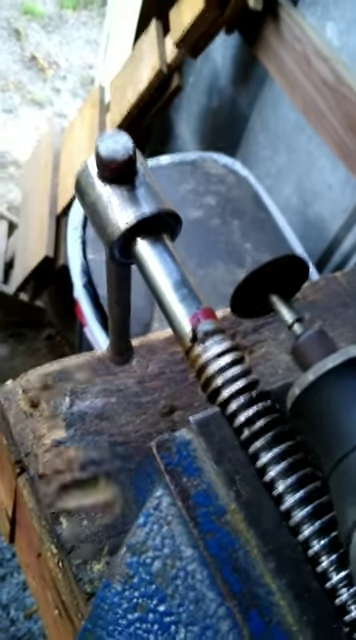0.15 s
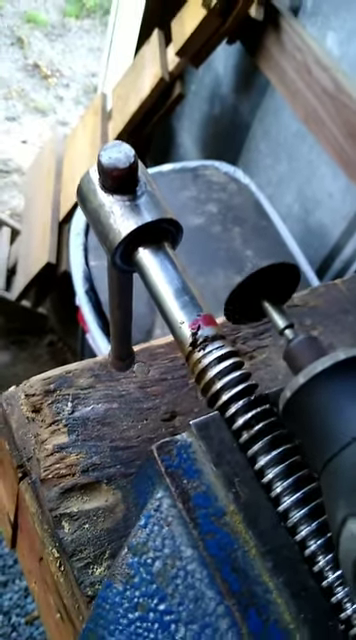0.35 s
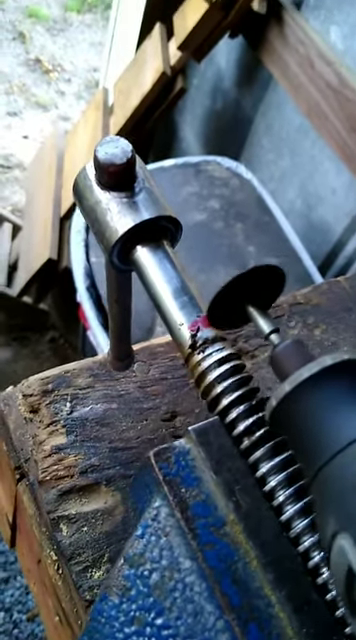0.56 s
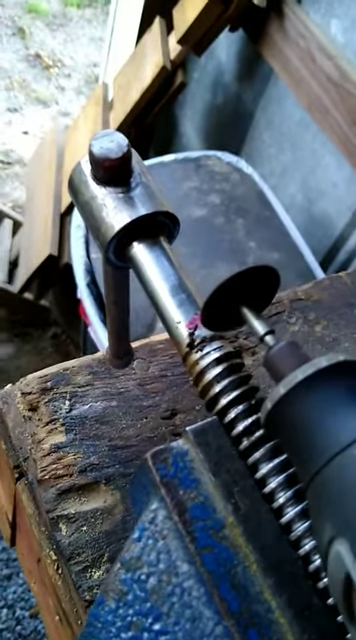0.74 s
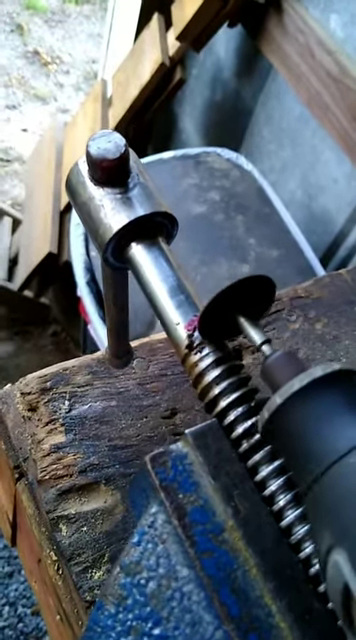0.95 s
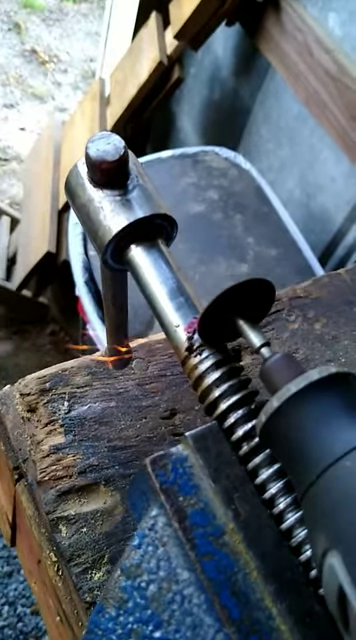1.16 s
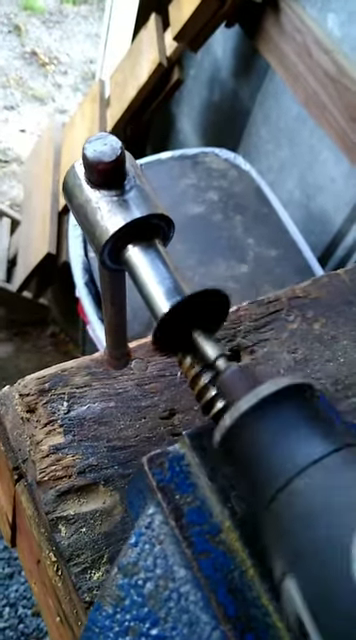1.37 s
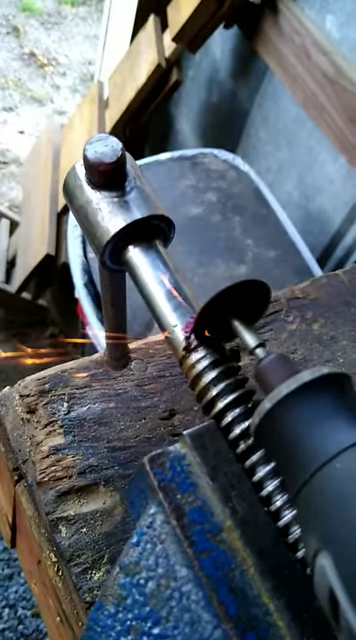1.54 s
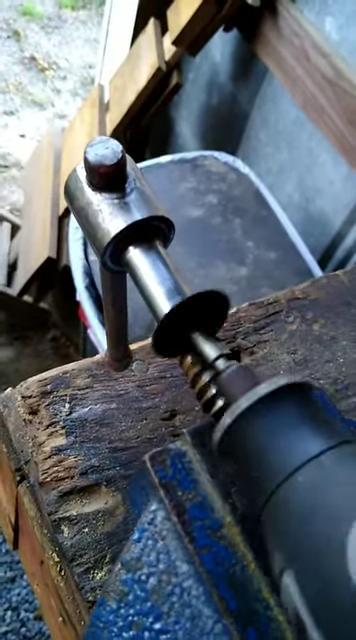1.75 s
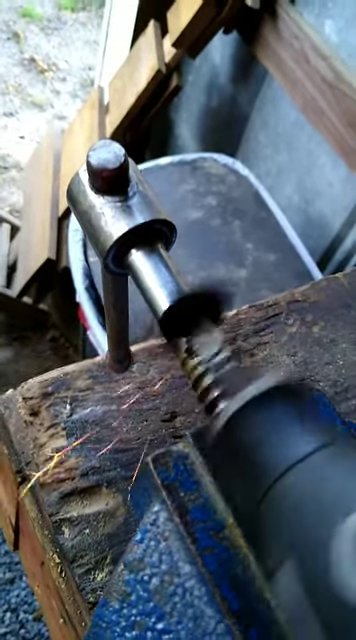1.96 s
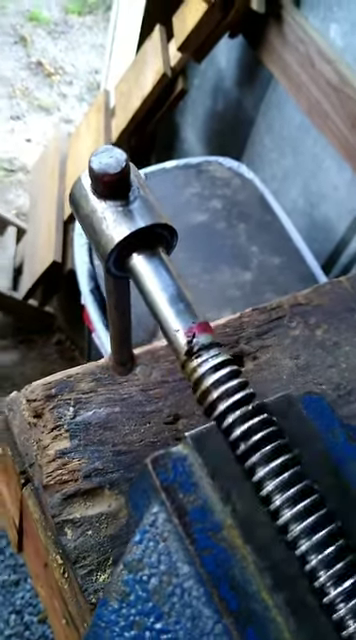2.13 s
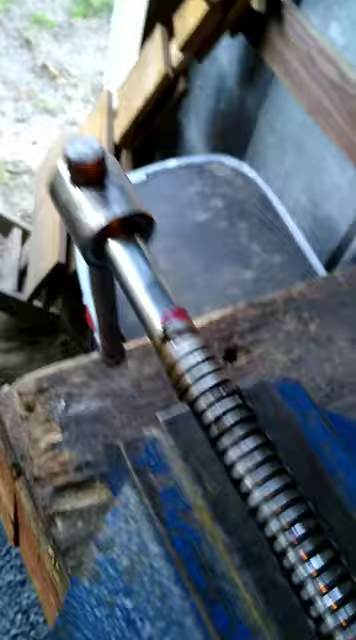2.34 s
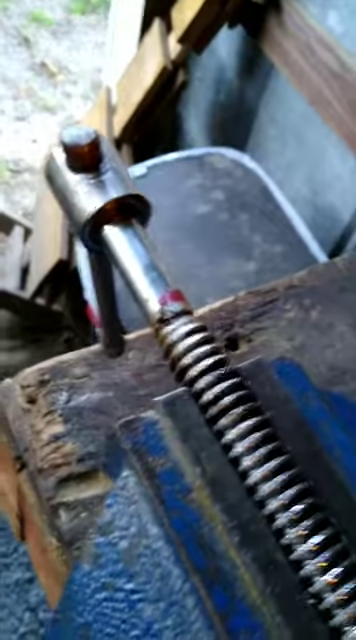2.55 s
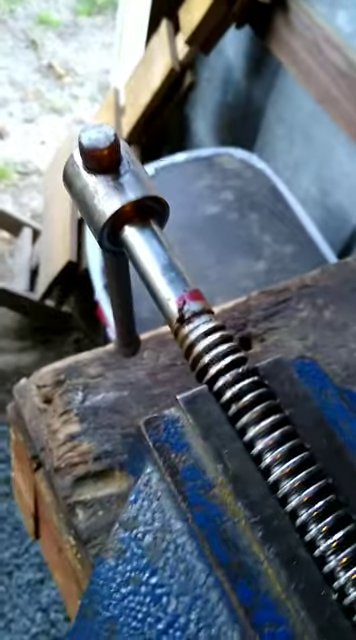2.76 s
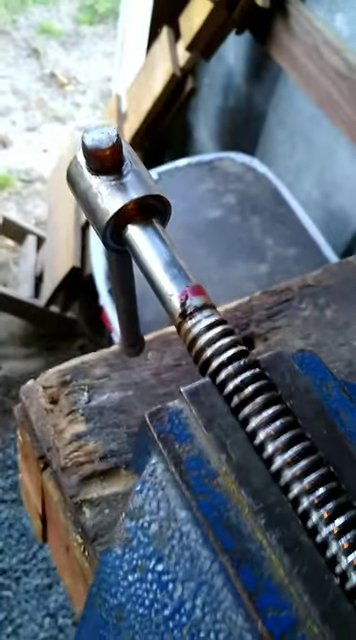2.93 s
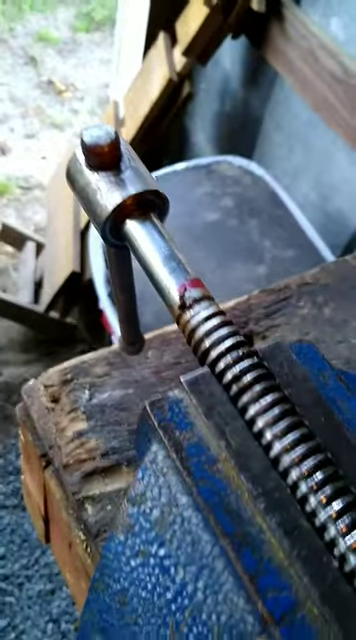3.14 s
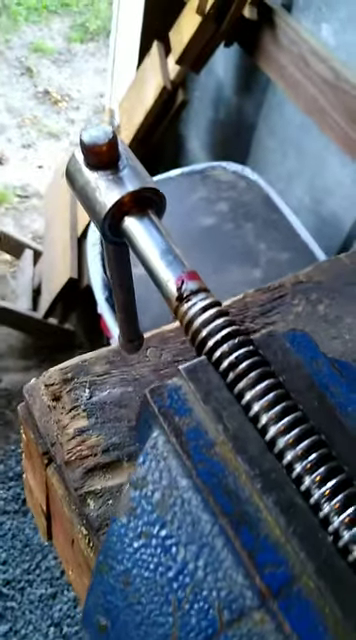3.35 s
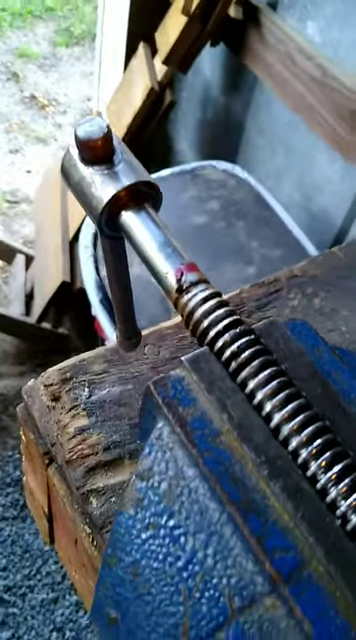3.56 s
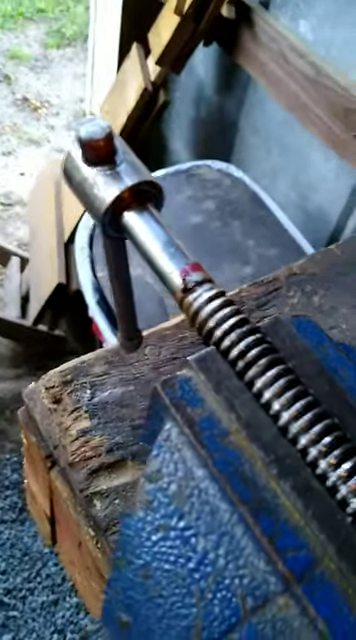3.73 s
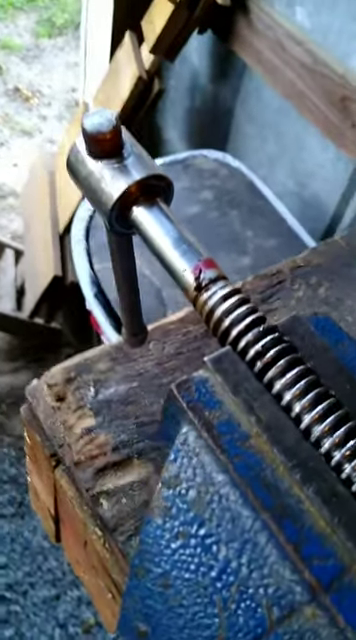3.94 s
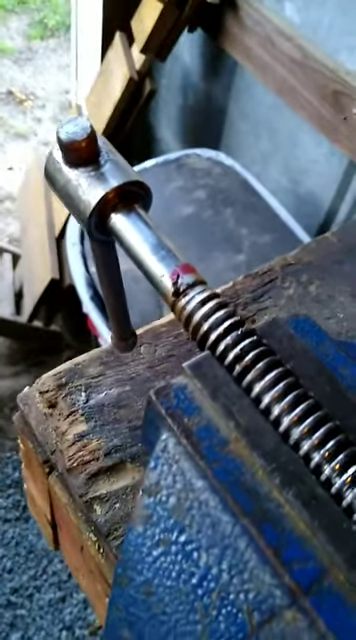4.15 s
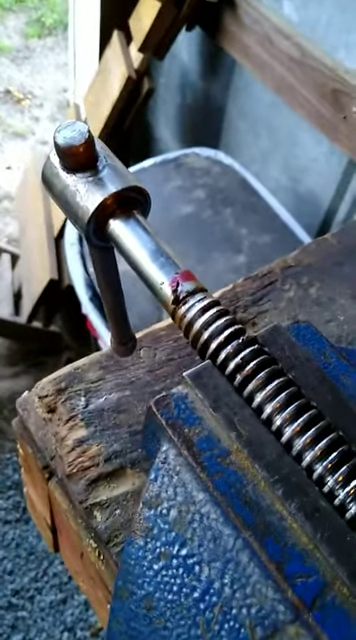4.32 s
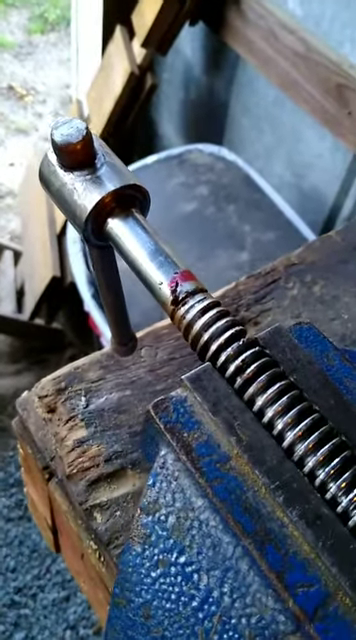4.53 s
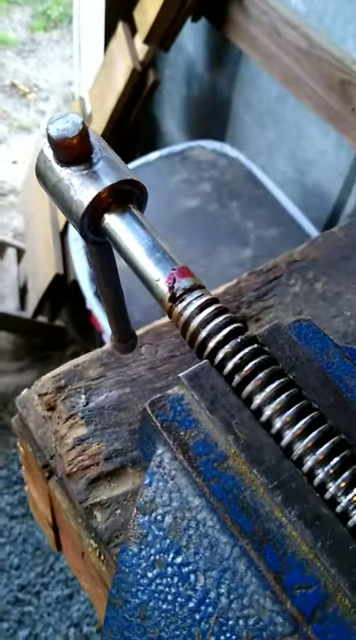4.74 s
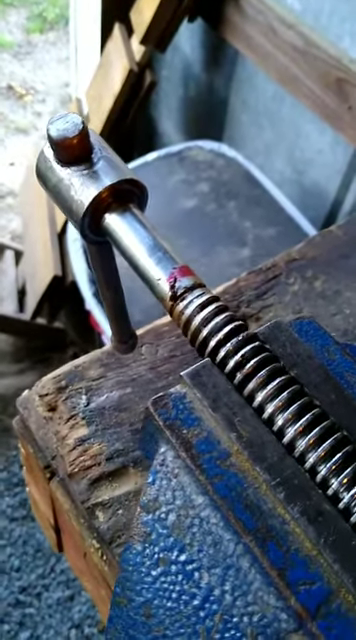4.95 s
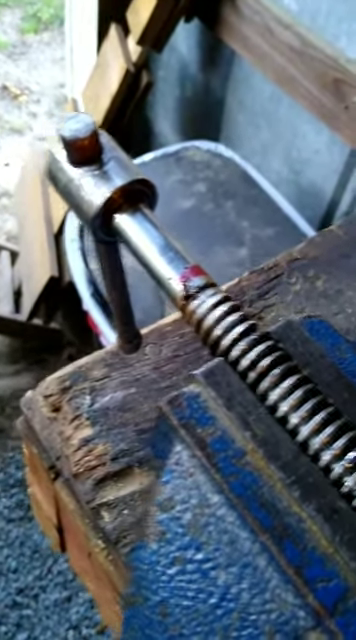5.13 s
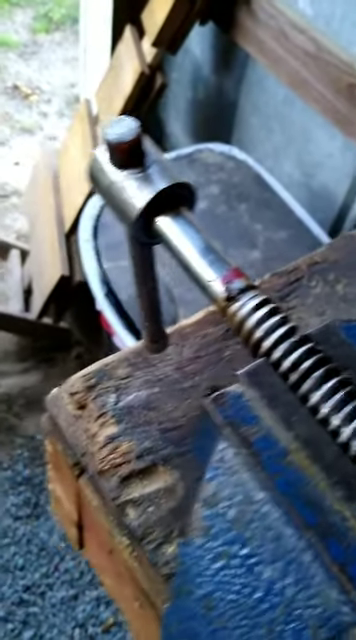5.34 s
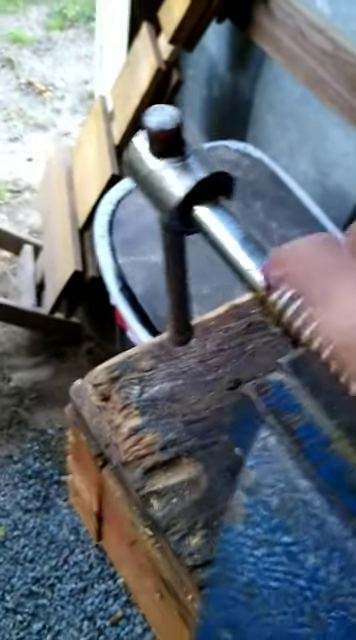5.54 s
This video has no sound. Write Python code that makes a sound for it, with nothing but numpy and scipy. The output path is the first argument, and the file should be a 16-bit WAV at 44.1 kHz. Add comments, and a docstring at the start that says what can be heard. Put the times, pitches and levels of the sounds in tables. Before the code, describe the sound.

From the start a small cordless rotary tool runs close to the microphone at very high speed: a steady hum near 480 Hz, shrill motor tones around 9-11 kHz, whirring fan air and fine brush hiss. At about 1.0 s the cut-off disc touches a clamped steel screw with a brief graze, then grinds until 2.13 s: a loud, bright, sizzling rasp with rough growl, flickering in strength. The motor pitch sags and recedes behind the cut; dull bumps occur near 1.45, 1.55 and 1.64 s. A faint low hum from the screw begins around 2.0 s and fades by about 2.5 s. After the disc lifts, the pitch quickly climbs back. At 2.75 s the tool lands on the wooden bench with a hollow, rapidly bouncing thud, slight rattle and short dull tail. It keeps whining to the end at 5.6 s, its air noise softer and its treble gently shifting.

```python
"""A cordless rotary tool whines at about 29000 rpm: motor tones, a spindle hum, fan air and brush hiss.
Its cut-off disc then grinds a steel screw in a vice for a second: looped rim noise, growl and dull bumps.
The motor sags under the load and gain control turns the loud cut down, motor included.
Late in the cut the screw starts a brief hum, a low sine that fades after it; the spindle runs back up.
The tool lands on a wooden bench, a bank of ringing modes, and keeps running to the end."""
import sys
import numpy as np
from scipy import signal
from scipy.fft import rfft, irfft, next_fast_len
from scipy.io import wavfile
from scipy.ndimage import uniform_filter1d, minimum_filter1d, map_coordinates

SR = 44100
rng = np.random.default_rng(int(sys.argv[2]) if len(sys.argv) > 2 else 0)


def persist_wave(psi):
    """Save psi, clipped to +-1, as 16-bit WAV."""
    counts = np.round(np.clip(psi, -1, 1) * 32767).astype(np.int16)
    wavfile.write(sys.argv[1], SR, np.atleast_2d(counts).T)


N = 246519
TIME = np.arange(N) / SR


def from_db(db):
    """Decibels to gain."""
    return 10 ** (np.asarray(db) / 20)


def rms_one(x):
    """Scale to rms 1."""
    return x / np.sqrt(np.mean(x ** 2) + 1e-20)


def butter(order, hz, kind="low"):
    """Butterworth filter sections."""
    return signal.butter(order, hz, kind, fs=SR, output="sos")


def in_time(rows):
    """Each column of a curve, sample by sample."""
    s, *columns = np.transpose(rows)
    return [np.interp(TIME, s, column) for column in columns]


def swell(s, half_s):
    """A smooth rise to 1 and fall around the time s."""
    return np.exp(-((TIME - s) / half_s) ** 2)


def drift(rate):
    """Smooth random curve of spread about 1 that changes about rate times a second."""
    knots = rng.standard_normal(int(2 * rate * N / SR) + 4)
    smooth = signal.resample(knots, 8 * len(knots))
    return np.interp(TIME * 16 * rate, np.arange(len(smooth)), smooth)


def lagging(x, time_s):
    """Follow x with a time constant."""
    r = np.exp(-1 / (time_s * SR))
    return signal.lfilter([1 - r], [1, -r], x)


def ring(force, hz, t60):
    """A resonator: a unit click sets a sine of height 1 ringing, 60 dB down after t60 seconds."""
    r = from_db(-60 / (t60 * SR))
    w = 2 * np.pi * hz / SR
    return signal.lfilter([0, np.sin(w)], [1, -2 * r * np.cos(w), r * r], force + 1e-18)


def colour(pair, spectrum):
    """Give two channels their spectra; their mean has rms 1."""
    hz, *sides = np.transpose(spectrum)
    size = next_fast_len(N)
    log_hz = np.log(np.fft.rfftfreq(size, 1 / SR) + 1)
    gains = from_db([np.interp(log_hz, np.log(hz), side) for side in sides])
    out = irfft(rfft(pair, size) * gains, size)[:, :N]
    return out / np.std(out.mean(axis=0))


def stereo_noise(alike_hz):
    """White noise, the same at both ears in the bass and wide in the treble."""
    mid, side = rng.standard_normal((2, N))
    side = signal.sosfilt(butter(1, alike_hz, "high"), side)
    return np.array([mid + side, mid - side])


def worn_rim(turns, memory, count):
    """A pattern of count spots round the rim that returns every turn, a little changed by wear."""
    keep = np.clip(memory, 0, .98)
    fresh = rng.standard_normal((int(turns[-1]) + 2, count))
    rim = signal.lfilter([np.sqrt(1 - keep ** 2)], [1, -keep], fresh, axis=0)
    return map_coordinates(rim.ravel(), [turns * count], order=3, mode="nearest")


def buzzing_noise(turns, buzz, memory, period=2):
    """Turbulence, part of which repeats every period turns as a dense buzz of unsteady tones."""
    repeated = np.array([worn_rim(turns / period, memory, count=96 * period) for ear in range(2)])
    repeated = signal.sosfilt(butter(2, 1500, "high"), repeated)
    plain = stereo_noise(alike_hz=1040)
    # plain noise stands in for the repeats in the bass
    bass = signal.sosfilt(butter(2, 1500), stereo_noise(alike_hz=1040))
    return plain + buzz * (repeated + bass)


def tone(turns, multiple, waver_db, spread):
    """One fluttering tone locked to the spindle; the higher the multiple, the more the ears differ."""
    phase = 2 * np.pi * (multiple * turns + rng.random())
    height = multiple / (multiple + 2)
    mid = np.sin(phase)
    side = spread * height * np.cos(phase + .5 * drift(1.273)) * rng.choice([-1, 1])
    flutter_db = waver_db * (.5 * drift(6.6) + drift(30)) * height
    return np.array([mid + side, mid - side]) * from_db(flutter_db)


def spindle():
    """Angle in turns and load (0-1): the motor sags in the cut and spins up again after it."""
    # running free: (time [s], speed [turns per s])
    free_speed = [(0, 483), (.3, 485.4), (1, 485.2), (2.6, 483), (3.3, 483.3), (4, 484.2), (4.35, 485.3),
                  (4.7, 483.8), (5.59, 484.8)]
    # slowed by the load of the cut: (time [s], speed lost [turns per s])
    load_sag = [(1.04, 0), (1.1, 9), (1.25, 18), (1.325, 50), (1.44, 58), (1.535, 28), (1.6, 55),
                (1.68, 42), (1.82, 37), (1.88, 42), (1.94, 35), (2, 37), (2.08, 26), (2.13, 37)]
    spin_up_s = .07  # time constant of the recovery
    sag, = in_time(load_sag)
    sag = sag * np.exp(-np.maximum(TIME - load_sag[-1][0], 0) / spin_up_s)
    free, = in_time(free_speed)
    speed = free - sag + .45 * drift(4) + .25 * drift(12) + .45 * drift(90)
    return np.cumsum(speed) / SR, sag / sag.max()


def whine(turns, on_bench, level_db):
    """Fan and commutator tones on multiples of the spindle rate; single tones change as they beam."""
    # motor tones before the overall level:
    # (multiple of spindle rate, level in the hand [dB], level on the bench [dB], left minus right [dB])
    motor_tones = [(2, -32, -40, -1), (3, -34.5, -39, -3.5), (6, -34.5, -37.5, -6.5), (9, -37.5, -36, 2),
                   (12, -35.5, -43, -8), (15, -42, -41.5, -6.5), (17.5, -40, -37, -3), (18, -20, -32, -4.5),
                   (18.5, -35.5, -42, -5), (20, -34, -36.5, -13), (20.5, -33, -40, 10),
                   (21, -21, -29, -0.5), (22, -25.5, -34, -9), (22.5, -26, -54, 0), (23, -31, -37, -5),
                   (24, -42, -33, -5), (25, -42, -45, 0), (26, -40, -34, -7), (27, -32, -33, -2),
                   (29, -36, -37, 6)]
    # as the tool turns, a tone beams towards the microphone or away:
    # (time [s], half length [s], multiple of spindle rate, change [dB])
    tone_beams = [(2.29, .15, 3, 4), (2.43, .13, 6, -7), (2.24, .09, 9, 3), (2.52, .14, 9, 8.5),
                  (5.15, .7, 9, -3), (3.2, .19, 9, -11), (3.7, .19, 9, 3.5), (2.24, .08, 12, 8),
                  (3.1, .55, 15, -6), (3.66, 0.25, 18, -17), (5.67, .45, 18, 8), (0.16, 0.18, 21, -7),
                  (0.55, 0.24, 21, 1), (3.62, 0.33, 21, -10), (4.53, 0.36, 21, 6), (3.2, 0.47, 22, 8),
                  (3.5, 1, 23, 2), (4, .4, 27, 4)]
    out = np.zeros((2, N))
    for multiple, held_db, bench_db, pan_db in motor_tones:
        db = held_db + on_bench * (bench_db - held_db) + level_db
        for s, half_s, beamed, change_db in tone_beams:
            if beamed == multiple:
                db = db + change_db / (1 + ((TIME - s) / half_s) ** 8)  # flat top, steep sides
        pan = from_db([[pan_db / 2], [-pan_db / 2]])
        out += from_db(db) * pan * tone(turns, multiple, waver_db=1.6, spread=1.0)
    return out


def unbalance(turns, load, near_db, level_db):
    """Hum at the spindle rate; under load the groove holds the disc steady and the hum fades and breaks."""
    # the hum breaks off: (time [s], half length [s], change [dB])
    hum_breaks = [(1.275, .03, -9), (1.405, .035, -18), (1.61, .035, -8), (2.06, .05, -6)]
    steadied_db = -5  # change at full load
    db = level_db + 1.17 * near_db + steadied_db * load ** 6
    db = db + sum(change_db * swell(s, half_s) for s, half_s, change_db in hum_breaks)
    return from_db(db) * tone(turns, 1, waver_db=3.5, spread=0.025)


def cooling_air(turns, near_db, on_bench, held_db, bench_db):
    """The fan pushes a whirring stream through the housing slots; its colour changes on the bench."""
    # spectra of the air, in the hand and on the bench: (frequency [Hz], left [dB], right [dB])
    held_colour = [(100, -31, -64), (200, -38, -27), (307, -17.5, -15.5), (470, -6.5, -6.5),
                   (630, -14.5, -8), (790, -8.5, 3.5), (1050, 3, 8.5), (1226, -2.5, 6), (1440, 0.5, -8.5),
                   (1750, 2, 3.5), (1870, -4, 1), (2560, 0, -1.5), (3100, -2.5, -5.5), (4280, -6, -3.5),
                   (5030, 5, -1.5), (4920, -14, -9), (5890, -0.5, 6.5), (6800, 1.5, -10), (8800, -4, 9.5),
                   (12100, -28, -30)]
    bench_colour = [(100, -34, -35), (203, -42, -42), (325, -26, -25), (470, -15.5, -11), (593, -25, -19.5),
                    (766, -15.5, -3), (1030, -17, 5), (1276, -7, 1.5), (1256, -9.5, -10.5),
                    (1540, -1, -6.5), (1790, -7.5, -5.5), (2460, -7.0, -2), (3120, -7, -4),
                    (3850, -7, -6.5), (4870, -6, -7), (5150, -20, -8), (5800, -1, -8), (7260, -21, -2.5),
                    (8500, 0, -3), (12000, -25.5, -35)]
    stream = buzzing_noise(turns, buzz=2, memory=.72)
    held = from_db(held_db + .5 * near_db) * colour(stream, held_colour)
    lying = from_db(bench_db) * colour(stream, bench_colour)
    return from_db(0.98 * drift(8.5)) * (held + on_bench * (lying - held))


def brushes(turns, near_db, on_bench, ring_db, hiss_db, throb, held_pan_db, bench_pan_db):
    """The brushes rub hardest once a turn: a fine hiss, and the housing ringing at 8-11 kHz."""
    # spectra of the ringing housing and the hiss: (frequency [Hz], left [dB], right [dB])
    housing_colour = [(5200, -37, -33), (7740, -13, -7.5), (8100, -10, -1), (8800, 0, 6), (10300, 5, 8.5),
                      (10780, 8.5, 5), (11550, -3.5, 3), (12300, -14, -13), (15000, -22, -14)]
    hiss_colour = [(5500, -33, -44), (7400, -2.5, -25), (8500, -6, -29), (10900, 2, -3), (12500, 1, 1.5),
                   (14000, 1.5, 0), (14800, -5, -3), (15700, -3, 0), (16500, -58, -50)]
    rub = 1 + throb * np.cos(2 * np.pi * turns)
    housing = colour(rub * buzzing_noise(turns, buzz=.8, memory=.7), housing_colour)
    hiss = colour(rub * buzzing_noise(turns, buzz=.5, memory=.7), hiss_colour)
    balance_db = held_pan_db + on_bench * (bench_pan_db - held_pan_db)
    pan = from_db([balance_db / 2, -balance_db / 2])
    ringing = from_db(ring_db + 1.44 * near_db + 0.44 * drift(36)) * pan * housing
    return ringing + from_db(hiss_db + 1.32 * near_db) * hiss


def beaming(x):
    """The brush noise beams as the tool turns: three parts of the treble rise and fall."""
    # (time [s], change below 9.4 kHz [dB], change at 9.4-11.5 kHz [dB], change above [dB])
    treble_beams = [(0, -16, 0.5, 6), (.25, 4, -8.5, 3.5), (.45, -7, 3, 4.5), (1, -4.5, -2.5, 2.5),
                    (2.3, 1.5, -4, 1.5), (2.6, 8.5, -7, 3.5), (2.85, 2.5, 4.5, 1), (3.1, 2, -2.5, 4),
                    (3.55, 1.5, 2.5, 5.5), (3.95, 4.5, 0.5, 6.5), (4.35, 4.5, 6.5, 4), (5.1, 5.5, 2, 4),
                    (5.59, -10, 3, 2)]
    low_db, middle_db, high_db = in_time(treble_beams)
    low, below = (signal.sosfiltfilt(butter(8, hz), x) for hz in (9400, 11500))
    return from_db(low_db) * low + from_db(middle_db) * (below - low) + from_db(high_db) * (x - below)


def rumble(level_db, top_hz):
    """Faint low background of the shed: noise through a gentle low-pass."""
    low = signal.sosfilt(butter(1, top_hz), stereo_noise(alike_hz=100))
    return from_db(level_db) * rms_one(low)


def touching():
    """How firmly the disc lies on the steel, as a gain that sinks in slowly and lets go fast."""
    # a first touch, a light graze, then the cut: (start [s], end [s], level [dB])
    contacts = [(1.001, 1.016, -5), (1.012, 1.036, -15), (1.033, 2.132, 1)]
    bite_s, let_go_s = .03, .003  # ramp in, time constant out
    firmness = np.zeros(N)
    for start, end, db in contacts:
        sink_in = np.clip((TIME - start) / bite_s, 0, 1)
        firmness += from_db(db) * sink_in * np.exp(-np.maximum(TIME - end, 0) / let_go_s)
    return firmness


def grinding(turns, level_db, lumpy_db, flutter_db, lag_s, top_db):
    """Grit strikes in nearly the same order each turn, high spots bite harder; disc and screw ring."""
    # the disc in the groove, before the overall levels:
    # (time [s], grinding level [dB], share of the brightest ring [dB])
    cut_curve = [(1.045, -8.5, 2), (1.07, -16, 3), (1.416, -20, -9), (1.532, -13.5, 0.5), (1.54, -27, -10),
                 (1.586, -14, -5.5), (1.746, -19.5, 3), (1.762, -20, -1), (1.862, -21, 17),
                 (1.966, -13.5, 2), (2.002, -16.5, 14), (2.12, -18.5, -5.5)]
    # spectrum of the rasp: (frequency [Hz], left [dB], right [dB])
    grind_colour = [(101, -19, -41), (510, -23.5, -27.5), (3760, -20.5, -19), (4770, -16.5, -13.5),
                    (7080, -8.5, -7.5), (8000, -45, -41), (8030, -5, -3), (8960, -2, -6), (8960, 0.5, -14),
                    (10630, -27, 11), (10830, 8, -30), (12450, 8, 9.5), (14800, 4.5, -4), (16400, -29, -16)]
    # the disc bites harder or rides up in the groove: (time [s], half length [s], change [dB])
    groove_bites = [(1.095, 0.013, 1), (1.21, 0.0055, 1), (1.4, 0.057, -1.5), (1.45, 0.031, -5.5),
                    (1.515, .014, -7), (1.566, 0.017, -2), (1.943, 0.013, -3.5), (1.979, .016, 0)]
    scrape_db, scrape_flutter_db = .5, 1.5  # scraping rim beside the grit, and how unevenly it bears
    grind_db, bright_db = in_time(cut_curve)

    angle = turns + .0025 * drift(70)
    grit = worn_rim(angle, memory=.85, count=96) + .3 * rng.standard_normal(N)
    scattered = worn_rim(angle, memory=.8, count=96) + .3 * rng.standard_normal(N)
    bite = from_db(lumpy_db * worn_rim(turns, memory=0.68, count=8))
    direct = rms_one(grit * bite)
    # the right ear hears the contact later, mixed with sound off the vice and the bench
    right = rms_one(np.interp(TIME - lag_s, TIME, direct) + rms_one(scattered * bite))
    strikes = signal.sosfilt(butter(6, 8000, "high"), np.array([direct, right]))

    # below 8 kHz the rim scrapes alike on every turn: a comb of tones that bends with the speed
    rim = rms_one(buzzing_noise(turns + .006 * drift(45), buzz=8, memory=.9, period=1))
    scrape = signal.sosfilt(butter(6, 8000), rim)
    scrape = scrape * from_db(scrape_db + scrape_flutter_db * drift(25))
    rasp = colour(strikes + scrape, grind_colour)

    # the angle of the disc in the groove decides how bright it rings
    top = signal.sosfiltfilt(butter(4, 13200, "high"), rasp)
    share = np.clip(from_db(bright_db + top_db + 1.5 * drift(12)) ** 2, .1, .8)
    rasp = np.sqrt(2 * share) * top + np.sqrt(2 * (1 - share)) * (rasp - top)
    pressure_db = sum(change_db * swell(s, half_s) for s, half_s, change_db in groove_bites)
    return from_db(grind_db + pressure_db + level_db + flutter_db * drift(35)) * rasp


def growl(turns, load, chatter_db):
    """The loaded shaft shakes the housing at low multiples of its rate, more as the load grows."""
    # (multiple of spindle rate, level at full load [dB], change at no load [dB])
    growl_tones = [(2, -33, -11), (3, -30, -11), (4, -37, -9)]
    # the disc snags and a tone swells: (time [s], half length [s], multiple of spindle rate, gain [dB])
    snags = [(1.335, .05, 2, 9), (1.39, .07, 3, 2), (1.72, .05, 3, 4), (1.9, .06, 4, 5)]
    shake_turns = .026  # jitter about the steady angle
    out = np.zeros((2, N))
    angle = turns + shake_turns * drift(70)
    for multiple, full_db, eased_db in growl_tones:
        db = full_db + eased_db * (1 - load) + chatter_db * drift(17)
        for s, half_s, shaken, gain_db in snags:
            if shaken == multiple:
                db = db + gain_db * swell(s, half_s)
        out += from_db(db) * tone(angle, multiple, waver_db=1.5, spread=1.0)
    return out * from_db([[-2], [1.5]])


def bumps():
    """Dull damped knocks as the disc jumps and the hand shifts: a click into one resonator each."""
    # (time [s], level [dB], frequency [Hz], t60 [s])
    bump_rows = [(1.03, -42, 110, .08), (1.445, -24, 200, .015), (1.456, -22, 125, .03),
                 (1.5525, 1, 330, .006), (1.6345, -8, 200, .008), (1.642, -16, 135, .025),
                 (2.127, -24, 130, .02), (2.128, -17, 600, .008)]
    out = np.zeros(N)
    for s, db, hz, t60 in bump_rows:
        click = np.zeros(N)
        click[round(s * SR)] = from_db(db)
        out += ring(click, hz, t60)
    return out


def screw_hum():
    """The screw swings unevenly in the vice: a low wavering sine, entering late in the cut, fading after."""
    screw_hz, level_db = 97, -48.5
    start_s, attack_s, hold_s, fade_db_per_s = 2.01, 0.041, 0.35, 105  # hold counts from the start
    since = TIME - start_s
    fade_db = fade_db_per_s * np.maximum(since - hold_s, 0)
    swing = np.clip(since / attack_s, 0, 1) * from_db(level_db - fade_db)
    return swing * from_db(2.5 * drift(12)) * np.sin(2 * np.pi * screw_hz * TIME + .8 * drift(21))


def pushes(rows):
    """Soft contacts as squared-sine pulses from rows of (time [s], level [dB], length [s])."""
    out = np.zeros(N)
    for s, db, length_s in rows:
        push = np.sin(np.pi * np.clip((TIME - s) / length_s, 0, 1)) ** 2
        out += from_db(db) * push / push.sum()
    return out


def bench(level_db, lean_db, rattle_db, rattle_t60, tail_db, tail_t60):
    """Bounces drive the modes of the bench top; loose things rattle; the shed answers with a dull tail."""
    # the tool lands and bounces: (time [s], level [dB], contact length [s])
    bounces = [(2.7455, -12.5, 0.0014), (2.7512, -7.5, 0.0014), (2.772, -10.5, 0.0022),
               (2.792, -21, 0.0026), (2.802, -18.5, 0.0018), (2.823, -34, 0.0021), (2.869, -37, 0.0032),
               (2.911, -42, 0.0033)]
    # modes of the wooden top: (frequency [Hz], level [dB], t60 [s])
    bench_modes = [(110, -27, 0.07), (155, -8.5, 0.2), (193, -17, 0.085), (224, -12, 0.067),
                   (268, -4, 0.09), (316, -6.5, 0.079), (354, -17, .05), (385, -6, 0.068),
                   (413, -16, 0.099), (520, -17, .03), (600, -7.5, .045), (728, -15, 0.029)]
    since = TIME - bounces[0][0]
    touches = (rng.random(N) < 300 / SR) * rng.standard_normal(N) * (since > 0)  # about 300 a second
    rattle = lagging(touches, .0005) * from_db(rattle_db - 60 * np.abs(since) / rattle_t60)
    force = -pushes(bounces) + rattle
    thud = np.zeros((2, N))
    for k, (hz, db, t60) in enumerate(bench_modes):
        # neighbouring modes radiate towards opposite ears
        lean = (-1) ** k * np.array([[lean_db], [-lean_db]])
        thud += from_db(db + lean) * ring(force, hz, t60)
    thud = signal.sosfilt(butter(3, 88, "high"), thud)
    shed = rng.standard_normal((2, SR)) * from_db(-60 * TIME[:SR] / tail_t60)
    shed /= np.linalg.norm(shed, axis=1, keepdims=True)
    tail = signal.fftconvolve(thud, shed, axes=1)[:, :N]
    return from_db(level_db) * (thud + from_db(tail_db) * tail)


def scene():
    """One spindle angle drives motor, air, brushes and disc; bumps, screw, bench and rumble join in."""
    # how near the tool is to the microphone, weighted by each layer: (time [s], level [dB])
    nearness = [(0, -2.5), (.55, -2.5), (2.28, -1), (2.55, -5), (2.85, -6.5), (3.5, -6.5), (3.9, -8.5),
                (4.7, -7.5), (5.2, -6), (5.59, -9.5)]
    lowered_s, resting_s = 1.98, 2.94  # the hand takes the tool down to the bench
    turns, load = spindle()
    near_db, = in_time(nearness)
    on_bench, = in_time([(lowered_s, 0), (resting_s, 1)])
    contact = touching()

    shaken_turns = turns + 0.0038 * contact * drift(89)
    motor = from_db(-6 * load) * whine(shaken_turns, on_bench, level_db=-4.5)
    motor = motor + unbalance(turns, load, near_db, level_db=-29.5)
    air = from_db(-1.5 * load) * cooling_air(turns, near_db, on_bench, held_db=-23, bench_db=-30.0)
    brush = beaming(brushes(turns, near_db, on_bench, ring_db=-21.0, hiss_db=-24.5, throb=0.16,
                            held_pan_db=-9.5, bench_pan_db=-1.0))
    background = rumble(level_db=-76, top_hz=9.2)
    rasp = grinding(turns, level_db=14.5, lumpy_db=-2.0, flutter_db=3, lag_s=0.000317, top_db=1.5)
    cut = contact * (rasp + growl(turns, load, chatter_db=2.2))
    landing = bench(level_db=-0.5, lean_db=1.5, rattle_db=-30.5, rattle_t60=0.79,
                    tail_db=-16, tail_t60=0.3)
    return motor + air + brush + background + cut + bumps() + screw_hum() + landing


def gain_control(x, threshold_db, squeeze, time_s, ahead_s):
    """Above the threshold the gain drops by a share of the excess: the motor recedes behind the cut."""
    level_db = 10 * np.log10(lagging(np.mean(x ** 2, axis=0), time_s) + 1e-12)
    level_db = np.interp(TIME + ahead_s, TIME, level_db)  # look ahead
    return x * from_db(-np.clip(squeeze, 0, 1) * np.maximum(level_db - threshold_db, 0))


def record(dry):
    """The microphone sheds deep bass, gain control tames the cut, a limiter holds peaks, the top is cut."""
    cutoff_hz = 15480
    thin = signal.sosfilt(butter(2, 55, "high"), dry)
    even = gain_control(thin, threshold_db=-13.0, squeeze=.76, time_s=0.014, ahead_s=0.0075)
    allowed = np.minimum(1, .97 / (np.abs(even).max(axis=0) + 1e-9))
    gain = uniform_filter1d(minimum_filter1d(allowed, size=131), size=131)  # about 3 ms
    return signal.sosfilt(signal.ellip(12, .1, 90, cutoff_hz, fs=SR, output="sos"), even * gain)


dry = scene()
out = record(dry)
persist_wave(out)
```